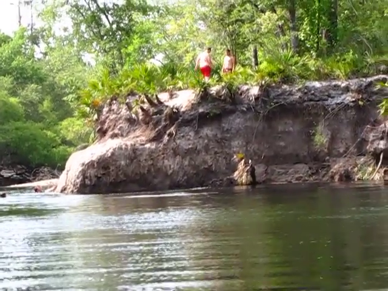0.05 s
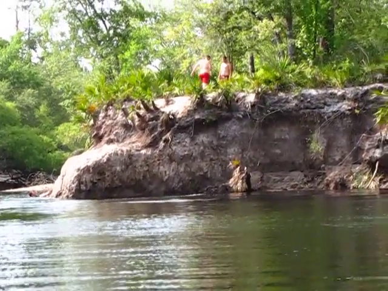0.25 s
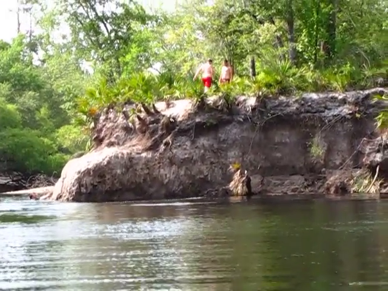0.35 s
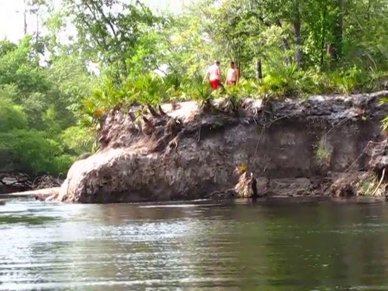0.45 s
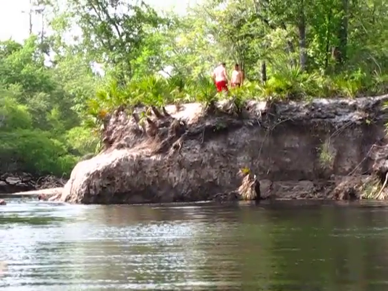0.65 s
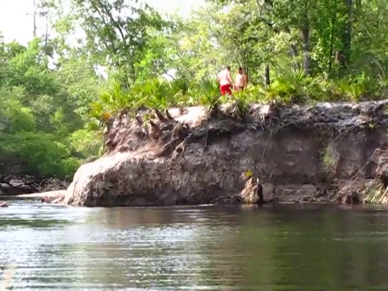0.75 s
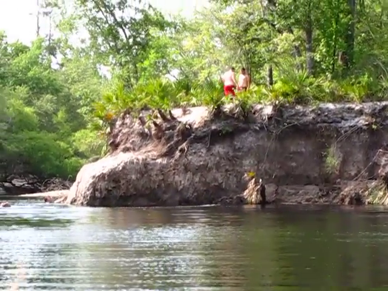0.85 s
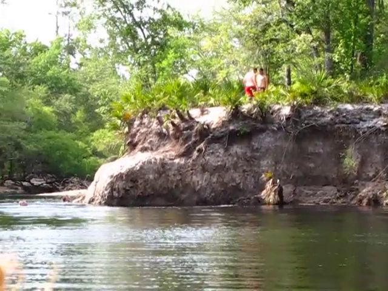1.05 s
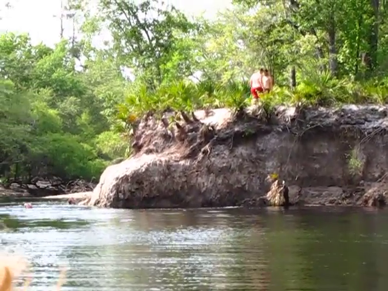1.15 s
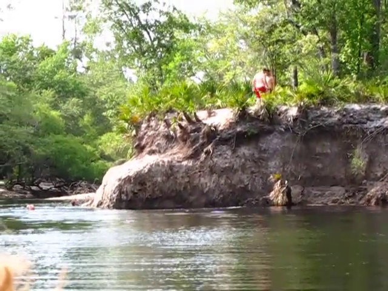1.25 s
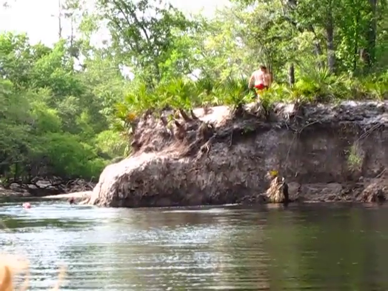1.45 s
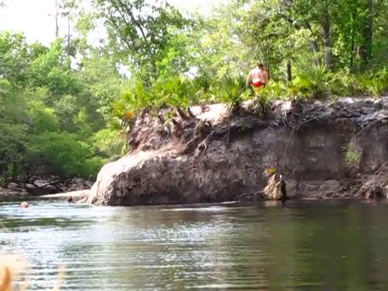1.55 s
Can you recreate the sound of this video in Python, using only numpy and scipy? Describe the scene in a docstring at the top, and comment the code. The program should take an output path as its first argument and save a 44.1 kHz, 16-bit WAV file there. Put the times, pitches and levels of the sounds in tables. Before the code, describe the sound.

A paddle knocks sharply on a hollow plastic kayak hull, then slaps and swishes the water.

```python
"""A paddle knocks four times on the plastic hull of a kayak on a quiet river: decaying modes, crack, rattle.
At the third knock the blade slaps into the water: pitched bubbles and short treble ticks.
Spray falls back, drips plink and a stroke swishes: clouds of random bubbles under a crackle of droplets.
All of it is close and reaches the left channel first, with a faint echo from the bank.
Behind it, shaped stereo noise makes the soft hiss of river and trees."""
import sys
import numpy as np
from scipy import signal
from scipy.fft import rfft, irfft
from scipy.io import wavfile

SR = 44100
rng = np.random.default_rng(int(sys.argv[2]) if len(sys.argv) > 2 else 0)


def to_wav(s):
    """Save 16-bit WAV."""
    ch = np.atleast_2d(s).T  # columns
    pcm = np.round(np.clip(ch, -1, 1) * 32767)  # PCM
    wavfile.write(sys.argv[1], SR, pcm.astype(np.int16))


N = 70560
T = np.arange(N) / SR


def from_db(db):
    """Decibels to gain."""
    return 10 ** (np.asarray(db) / 20)


def rms_one(x):
    """Scale to unit rms."""
    return x / np.sqrt(np.mean(x ** 2) + 1e-20)


def at_hz(points, hz):
    """Read a table on a log-frequency axis."""
    p = np.array(points)
    return np.interp(np.log(np.maximum(hz, 1)), np.log(p[:, 0]), p[:, 1])


def bins():
    """Frequencies of a full-length spectrum, in Hz."""
    return np.arange(N // 2 + 1) * SR / N


def lowpass(x, hz):
    """Causal second-order low-pass."""
    return signal.sosfilt(signal.butter(2, hz, fs=SR, output="sos"), x)


def bandpass(x, low_hz, high_hz):
    """Causal band-pass."""
    return signal.sosfilt(signal.butter(2, [low_hz, high_hz], "band", fs=SR, output="sos"), x)


def add(out, start_s, sound):
    """Mix a short sound in at its start time."""
    i = int(round(start_s * SR))
    out[i:i + len(sound)] += sound[:N - i]


def dying(t, t60_s):
    """Exponential decay, 60 dB in t60_s."""
    return np.exp(-np.log(1000) * t / t60_s)


def struck(modes, t):
    """Impact response: a sum of decaying sines of alternating sign."""
    out = np.zeros(len(t))
    for k, (hz, db, t60_s) in enumerate(modes):
        out += (-1) ** k * from_db(db) * dying(t, t60_s) * np.sin(2 * np.pi * hz * t)
    return out


# Shaft on hull. Each row: start in seconds, level in dB, contact low-pass in Hz, rattle in dB re the modes' scale.
KNOCK_EVENTS = [(0.2061, -5, 2980, -1.5), (0.38, -13.5, 1210, -0.5), (0.3954, -17.5, 1150, 4),
                (0.5735, -22.5, 1880, 3)]
# Main hull modes. Each row: frequency in Hz, relative level in dB, t60 in seconds.
HULL_MODES = [(98, -25.5, 0.13), (146, -25, 0.19), (155.3, -26, 0.19), (256.3, -22.5, 0.17),
              (299.5, -17.5, 0.15), (333.6, -24, 0.29), (417.6, -20.5, 0.14), (482, 2.5, 0.017),
              (641, -13, 0.069), (672, -15.5, 0.026), (943, -13.5, 0.047), (1021, -19, 0.093),
              (1730, -10.5, 0.02), (3035, -28.5, 0.095)]
CRACK_HZ, CRACK_DB, CRACK_T60_S = 1340, 0.5, 0.0043


def hull():
    """Each knock gives a crack, rings the hull's modes and sets off a rattle; a softer contact is duller."""
    t = T[:SR // 2]
    out = np.zeros(N)
    body = struck(HULL_MODES, t) + struck([(CRACK_HZ, CRACK_DB, CRACK_T60_S)], t)
    for start_s, db, contact_hz, rattle_db in KNOCK_EVENTS:
        ringing = body + from_db(rattle_db) * rattle(t)
        add(out, start_s, from_db(db) * lowpass(ringing, contact_hz))
    return out


# Spectrum of the hull's many weak modes. Each row: frequency in Hz, relative level in dB.
RATTLE_SPECTRUM = [(100, -30.5), (200, -25.5), (400, -17.5), (800, -17), (1600, -24.5), (3200, -20.5),
                   (6400, -34), (12000, -43)]
RATTLE_T60_AT_500_HZ_S, RATTLE_T60_POWER = 0.13, -0.62
RATTLE_SWELL_CYCLES = 2.9   # builds as waves cross the hull


def rattle(t):
    """Weak hull modes as half-octave noise bands: the lows build more slowly and last longer."""
    out = np.zeros(len(t))
    for hz in 100 * 2 ** np.arange(0, 7.1, .5):
        noise = rng.standard_normal(len(t))
        band = rms_one(bandpass(noise, hz / 2 ** .25, hz * 2 ** .25))
        swell = 1 - np.exp(-t * hz / RATTLE_SWELL_CYCLES)
        t60_s = RATTLE_T60_AT_500_HZ_S * (hz / 500) ** RATTLE_T60_POWER
        out += from_db(at_hz(RATTLE_SPECTRUM, hz)) * band * swell * dying(t, t60_s)
    return out


BUBBLE_SWELL_CYCLES = 0.69


def bubble(hz, t60_s, rise_oct_per_s):
    """A trapped air pocket: a sine that swells within a cycle or so, glides in pitch and dies."""
    t = T[:int(t60_s * SR) + 2]
    glide_hz = hz * (1 + np.log(2) * rise_oct_per_s * t)
    phase = 2 * np.pi * np.cumsum(glide_hz) / SR
    swell = 1 - np.exp(-(t * hz / BUBBLE_SWELL_CYCLES) ** 2)
    return np.sin(phase) * swell * dying(t, t60_s)


# Air pockets and single bubbles.
# Each row: start in seconds, starting pitch in Hz, level in dB, t60 in seconds, initial rise in octaves per second.
BUBBLE_EVENTS = [(0.3959, 2050, -2.5, 0.0062, 26), (0.3968, 1238, -1, 0.022, 35.5),
                 (0.4007, 2864, -7, 0.013, 3), (0.403, 1060, -49, 0.028, 39),
                 (0.4100, 3970, -34, 0.0099, -1), (0.414, 1810, -2, 0.0043, 0),
                 (0.4235, 810, -22.5, 0.046, 3), (0.441, 5180, -34.5, 0.026, -1),
                 (0.4660, 710, -29, 0.028, -13), (0.473, 1540, -28.5, 0.021, 0),
                 (0.4985, 1540, -31.5, 0.036, -1), (0.498, 2150, -19, 0.0053, 17),
                 (0.5385, 1930, -26, 0.0078, 6), (0.6063, 1230, -39, 0.028, 14),
                 (0.634, 1940, -24.5, 0.0077, 10), (0.6332, 1170, -29, 0.013, 8),
                 (0.6486, 2070, -23, 0.013, 27), (0.6640, 5220, -34.5, 0.015, 11),
                 (0.663, 1570, -47, 0.027, 11), (0.6720, 3600, -25, 0.011, 12),
                 (0.6864, 1005, -33, 0.042, 1), (0.6890, 1500, -29, 0.0095, 8),
                 (0.7095, 666, -29.5, 0.014, 9), (0.7305, 1430, -32, 0.027, 0), (0.73, 2270, -33, 0.014, 0),
                 (0.7304, 872, -36, 0.09, 16), (0.7343, 4860, -33.5, 0.011, 10),
                 (0.7426, 817, -26, 0.058, 17.5), (0.7790, 940, -34.5, 0.12, 18),
                 (0.804, 1720, -23, 0.014, 18), (0.8123, 1730, -24.5, 0.014, 24),
                 (0.8290, 780, -38, 0.038, 28), (0.926, 330, -40, 0.093, -4.5),
                 (0.9810, 1810, -29.5, 0.012, 10), (0.989, 2370, -29, 0.011, 2),
                 (1.0090, 2840, -25.5, .015, -3), (1.016, 344, -40.5, 0.14, -5),
                 (1.0450, 876, -36.5, 0.15, 6), (1.0770, 730, -27.5, 0.059, 11.5),
                 (1.149, 1510, -12.5, 0.01, 3), (1.1465, 4960, -32, 0.014, 12),
                 (1.1810, 2130, -14, 0.007, 11), (1.1935, 2300, -23, 0.034, 6),
                 (1.2030, 2110, -16, 0.025, -1), (1.2184, 988, -31, 0.061, 10.5),
                 (1.3308, 1315, -35, 0.046, 16)]


def plops():
    """The pocket of air under the blade and the bubbles that drips leave."""
    out = np.zeros(N)
    for start_s, hz, db, t60_s, rise_oct_per_s in BUBBLE_EVENTS:
        add(out, start_s, from_db(db) * bubble(hz, t60_s, rise_oct_per_s))
    return out


# Blade and drops on the surface. Each row: start in seconds, level in dB, lowest Hz, highest Hz.
SPLAT_EVENTS = [(0.098, -25, 4040, 9000), (0.248, -30, 7000, 11900), (0.38, -26, 6100, 15200),
                (0.3955, -7.5, 2970, 14800), (0.3983, -21, 5000, 16000), (0.4012, -20, 4000, 15000),
                (0.4045, -14, 4460, 7800), (0.4342, -20.5, 4000, 13100), (0.4535, -22, 4970, 8000),
                (0.4710, -27.5, 4000, 9300), (0.6300, -23.5, 3530, 6000), (0.6433, -23, 3970, 6500),
                (0.6658, -25.5, 4000, 15100), (0.671, -28, 2500, 13100), (0.688, -24.5, 9400, 15100),
                (0.7055, -29.5, 6000, 14000), (0.767, -11.5, 6260, 12200), (0.8020, -28.5, 3960, 13200),
                (0.9778, -28.5, 4040, 15000), (1.1515, -28, 2500, 7100), (1.2047, -20.5, 3050, 11900)]
# Colour of a splat. Each row: frequency in Hz, relative level in dB, t60 in seconds.
SPLAT_MODES = [(5720, -1, 0.001), (6410, -11.5, 0.005), (8480, -1.5, 0.0011), (11040, -7.5, 0.0028),
               (13500, -5, 0.0013)]


def splats():
    """Impacts on the water's surface: short bright ticks, each in its own range of the treble."""
    out = np.zeros(N)
    tick = struck(SPLAT_MODES, T[:SR // 20])
    for start_s, db, low_hz, high_hz in SPLAT_EVENTS:
        add(out, start_s, from_db(db) * bandpass(tick, low_hz, high_hz))
    return out


# Churned water. Each row: peak in seconds, bubble level in dB, e-fold rise in seconds, e-fold fall in seconds,
# lowest Hz, highest Hz, bubbles per second (saturates at 1000), spray level in dB.
WASH_EVENTS = [(0.399, -25, 0.0029, 0.022, 1103, 3300, 1100, -32.5),
               (0.401, -39, 0.008, 0.029, 3520, 7420, 800, -38.5),
               (0.672, -41.5, 0.044, 0.072, 1314, 3260, 480, -52),
               (0.760, -46.5, 0.045, 0.22, 630, 2260, 102, -50.5),
               (0.900, -53.5, 0.18, 0.17, 2530, 7300, 170, -75),
               (1.025, -45.5, 0.038, .11, 266, 621, 352, -71), (1.070, -59, .07, 0.1, 110, 187, 140, -66),
               (1.020, -50.5, 0.061, 0.24, 1195, 3200, 100, -71),
               (1.153, -33, 0.0096, 0.027, 1110, 2640, 1000, -44),
               (1.198, -37.5, 0.099, 0.041, 649, 1454, 540, -40),
               (1.199, -30, 0.048, 0.048, 1723, 2950, 650, -47),
               (1.281, -42, 0.12, 0.054, 1145, 3500, 500, -48.5),
               (1.160, -51, 0.086, 0.14, 4180, 8550, 710, -50)]
WASH_T60_CYCLES, WASH_SPREAD_DB, WASH_MAX_RISE_OCT_PER_S = 39, 20.5, 12


def wash(slots=1600):
    """Churned water swells and dies away: clouds of small bubbles with spray on top."""
    out, spray_power = np.zeros(N), np.zeros(N)
    slot_s = N / SR / slots   # at most one bubble per slot
    for peak_s, db, rise_s, fall_s, low_hz, high_hz, per_s, spray_db in WASH_EVENTS:
        swell = np.exp(-np.maximum((peak_s - T) / rise_s, (T - peak_s) / fall_s))
        cloud = np.zeros(N)
        for k, (born, when, pitch, size, rise) in enumerate(rng.random((slots, 5))):
            if born < per_s * slot_s:
                hz = low_hz * (high_hz / low_hz) ** pitch
                sound = bubble(hz, WASH_T60_CYCLES / hz, WASH_MAX_RISE_OCT_PER_S * rise)
                add(cloud, (k + when) * slot_s, from_db(WASH_SPREAD_DB * size) * sound)
        out += from_db(db) * swell * rms_one(cloud)
        spray_power += (from_db(spray_db) * swell) ** 2
    return out + np.sqrt(spray_power) * spray()


# Colour of the spray. Each row: frequency in Hz, relative level in dB.
SPRAY_SPECTRUM = [(1500, -2), (2800, 16), (3700, 7.5), (5000, 3), (7500, -8.5), (9500, -6), (12000, -2),
                  (14000, -12), (16000, -17)]
DROPLETS_PER_S, DROPLET_SPREAD_DB = 3500, 5


def spray():
    """Droplets as random clicks of either sign, coloured into a fine crackle of unit rms."""
    size_db = DROPLET_SPREAD_DB * np.minimum(rng.exponential(1, N), 4)
    sizes = from_db(size_db) * rng.choice([-1, 1], N)
    clicks = sizes * (rng.random(N) < DROPLETS_PER_S / SR)
    return rms_one(irfft(rfft(clicks) * from_db(at_hz(SPRAY_SPECTRUM, bins())), N))


def panned(db):
    """Left and right gains for a level difference."""
    return from_db(np.array([db, -db]) / 2)


# Stereo balance of the close sounds. Each row: frequency in Hz, left minus right in dB.
CLOSE_BALANCE = [(100, 0), (700, -1.7), (1400, -1), (2400, -3.6), (4400, 12), (8000, 5.5), (15000, 4)]


def beside_boat(x, lead_ms):
    """A close source on the left: early and brighter in the left channel."""
    sides = rfft(x) * panned(at_hz(CLOSE_BALANCE, bins()))
    # half the lead as advance on the left, half as delay on the right
    shift = np.exp(1j * np.pi * bins() * lead_ms / 1000 * np.array([[1], [-1]]))
    return irfft(sides * shift, N)


BANK_ECHO_DB, BANK_T60_S, BANK_CUT_HZ = -24.5, 0.22, 7500


def bank(x):
    """A faint dull scatter from the bank and the trees: convolution with decaying stereo noise."""
    tails = lowpass(rng.standard_normal((2, N)), BANK_CUT_HZ) * dying(T, BANK_T60_S)
    echo = signal.fftconvolve(x[None], rms_one(tails) / np.sqrt(N), axes=1)[:, :N]
    return from_db(BANK_ECHO_DB) * echo


# River and trees. Each row: frequency in Hz, relative level in dB.
RIVER_SPECTRUM = [(25, -5), (60, -13.5), (100, -8), (230, -12), (340, -6), (500, -5.5), (620, -6.5),
                  (850, -7.5), (1300, -11.5), (1900, -13.5), (5500, -17), (6900, -21), (8200, -14),
                  (9300, -25.5), (12000, -29.5), (14500, -36), (16200, -36)]
# Each row: frequency in Hz, left-right likeness from -1 to 1.
RIVER_COHERENCE = [(60, 0.96), (150, 0.8), (380, 0.91), (950, 0.83), (2380, 0.26), (5980, -0.39),
                   (15000, -0.19)]
# Each row: frequency in Hz, left minus right in dB.
RIVER_PAN = [(60, 1), (180, -2.5), (550, -1), (1650, -3.5), (4970, -1.5), (15000, 1)]
RIVER_DB, RIVER_WAVER_RMS_DB, RIVER_WAVER_CUT_HZ = -47.5, 0.32, 31


def river():
    """Soft steady hiss of moving water and leaves: shaped mid-side noise, wavering a little."""
    mid, side = rfft(rng.standard_normal((2, N)))
    alike = np.clip(at_hz(RIVER_COHERENCE, bins()), -1, 1)
    sides = np.sqrt(1 + alike) * mid + np.sqrt(1 - alike) * side * np.array([[1], [-1]])
    colour = from_db(at_hz(RIVER_SPECTRUM, bins())) * panned(at_hz(RIVER_PAN, bins()))
    noise = irfft(sides * colour, N)
    waver = rms_one(lowpass(rng.standard_normal(N), RIVER_WAVER_CUT_HZ))
    return rms_one(noise) * from_db(RIVER_DB + RIVER_WAVER_RMS_DB * waver)


HULL_LEAD_MS, BLADE_LEAD_MS, STROKE_LEAD_MS = 0.067, 0.1562, 0.13   # left before right


def scene():
    """Hull, blade and stroke close by, the river all round."""
    knocks = hull()
    blade = plops() + splats()
    stroke = wash()
    close = beside_boat(knocks, HULL_LEAD_MS)
    close += beside_boat(blade, BLADE_LEAD_MS)
    close += beside_boat(stroke, STROKE_LEAD_MS)
    return close + bank(knocks + blade + stroke) + river()


BASS_CUT_HZ, TOP_STOP_HZ, TOP_STOP_DB = 80, 17200, 70


def record(dry):
    """The microphone thins the deep bass; the top is cut."""
    thin = signal.sosfilt(signal.butter(2, BASS_CUT_HZ, "high", fs=SR, output="sos"), dry)
    return signal.sosfilt(signal.cheby2(14, TOP_STOP_DB, TOP_STOP_HZ, fs=SR, output="sos"), thin)


dry = scene()
out = record(dry)
to_wav(out)
```